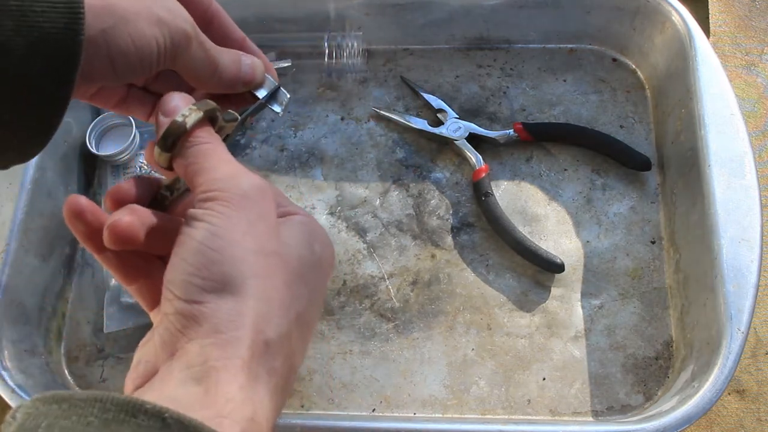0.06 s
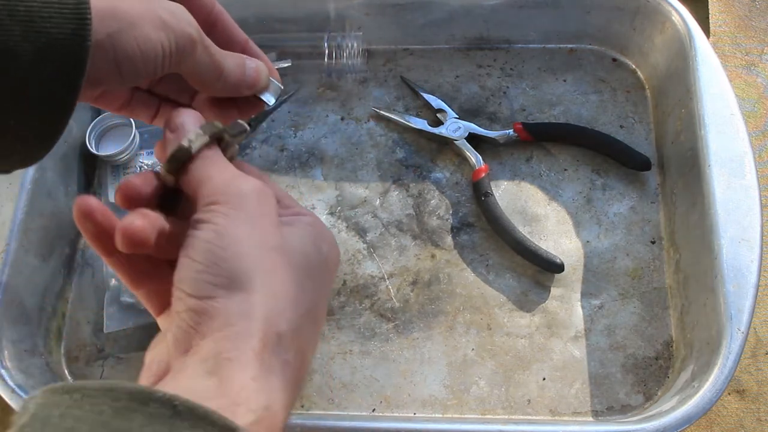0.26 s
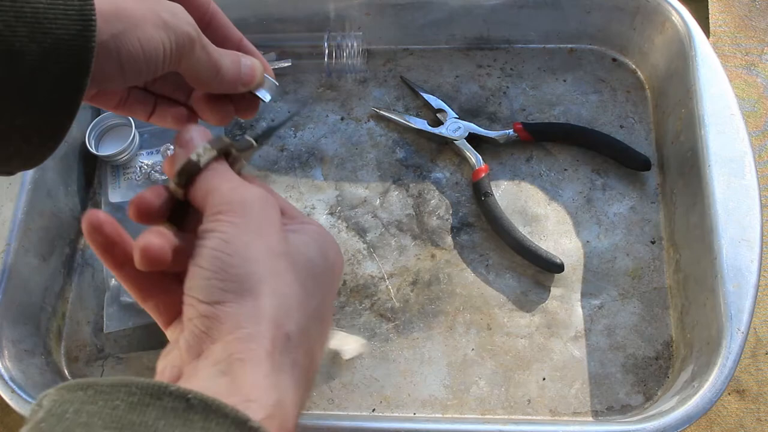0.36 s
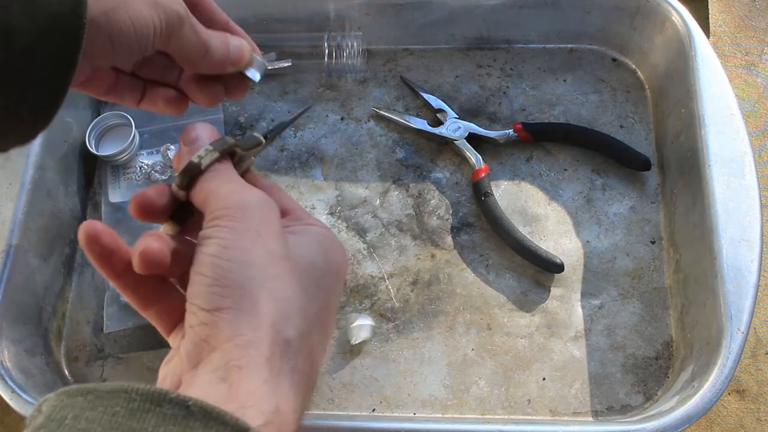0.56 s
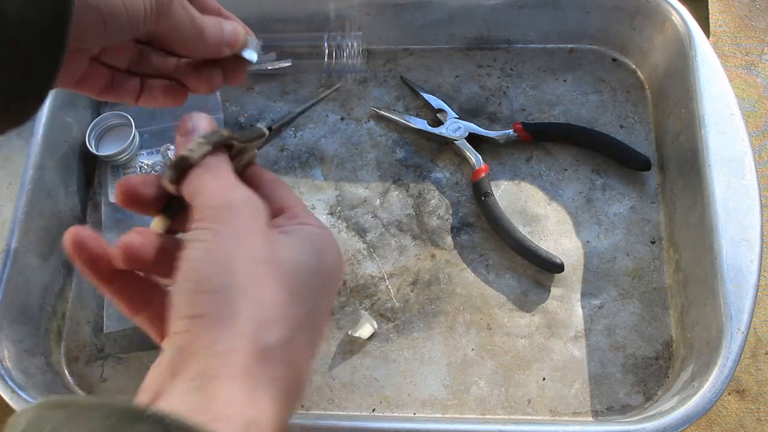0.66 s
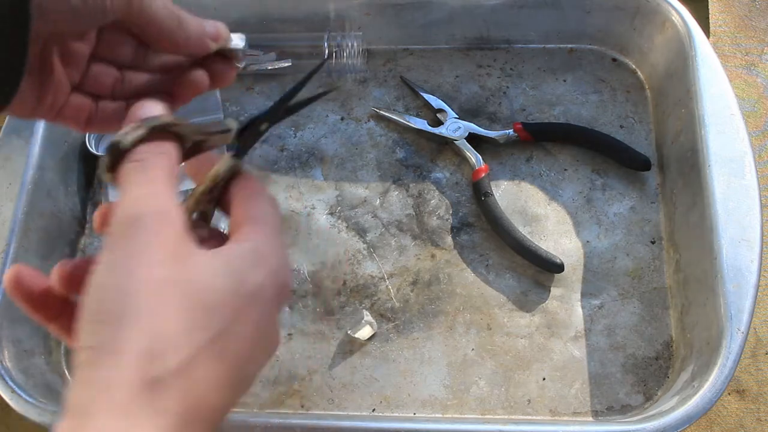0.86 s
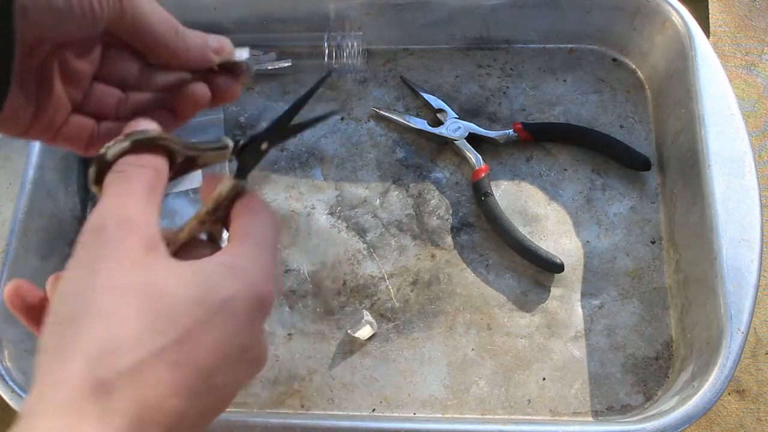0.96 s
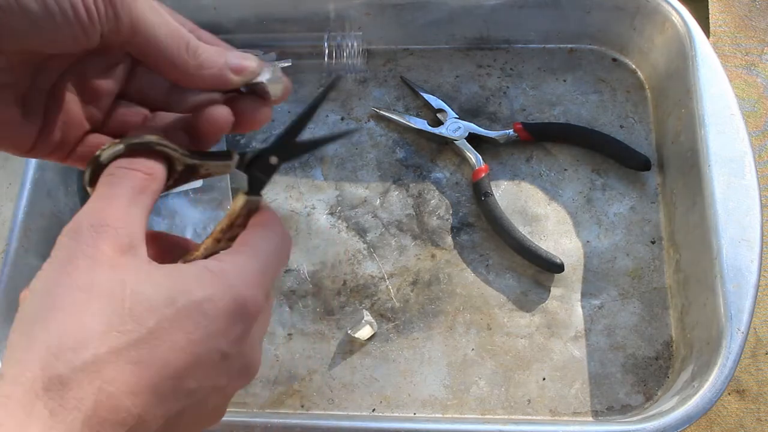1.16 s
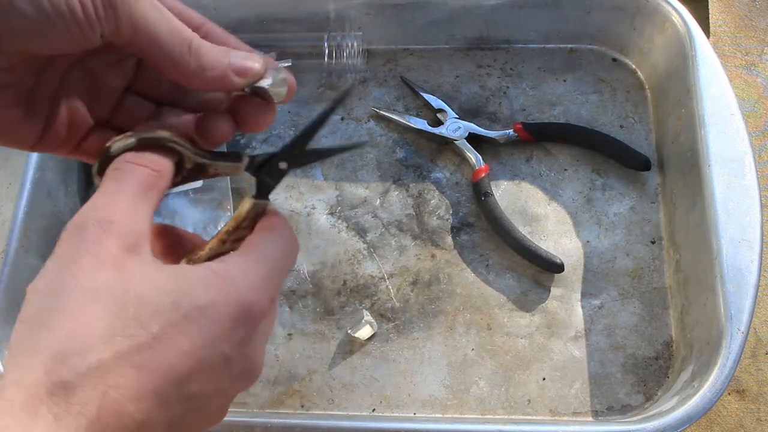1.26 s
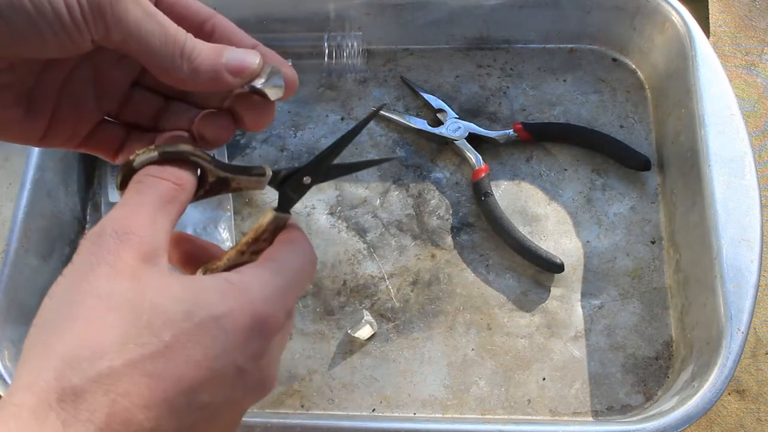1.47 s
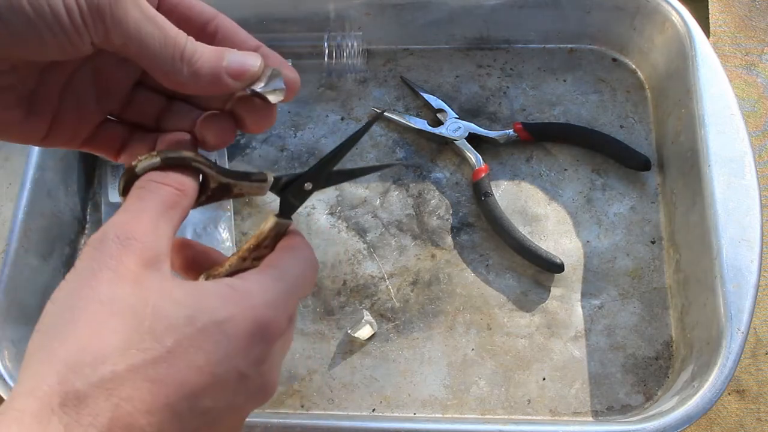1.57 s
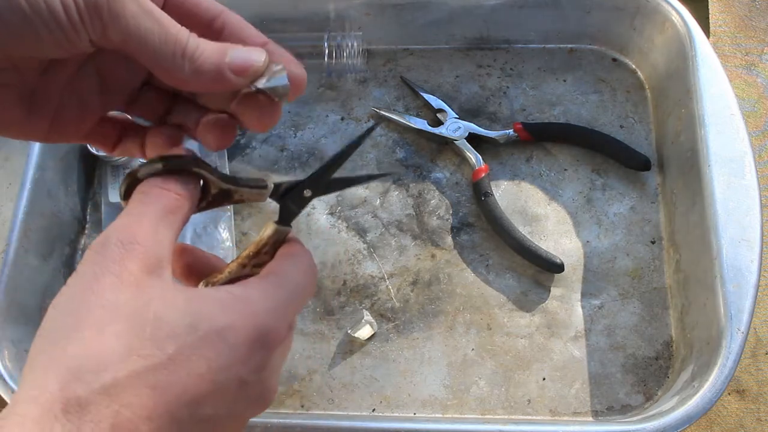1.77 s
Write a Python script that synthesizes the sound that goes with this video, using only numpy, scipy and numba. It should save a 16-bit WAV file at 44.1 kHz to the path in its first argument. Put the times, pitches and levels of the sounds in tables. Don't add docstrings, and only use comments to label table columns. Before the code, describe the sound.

A small piece of cut metal clangs into a sheet-metal baking pan just after a bright scissor snip, bounces in quick weakening ticks and settles; close microphone outdoors, soft air hiss and low rumble behind.

```python
import sys
import numpy as np
from scipy import signal
from scipy.fft import rfft, irfft
from scipy.io import wavfile
from scipy.ndimage import uniform_filter1d
from numba import njit

SR = 44100
rng = np.random.default_rng(int(sys.argv[2]) if len(sys.argv) > 2 else 0)


def ratio(d):
    e = np.asarray(d, float) / 20
    return 10 ** e


def waveform_to_disk(signal):
    frames = np.transpose(np.atleast_2d(signal))
    scaled = np.clip(frames, -1, 1) * 32767
    samples = np.round(scaled).astype(np.int16)
    wavfile.write(sys.argv[1], SR, samples)


N = 79380


def curve(table, hz):
    rows = np.array(table)
    return np.interp(np.log(hz), np.log(rows[:, 0]), rows[:, 1])


def unit(x):
    return x / np.sqrt(np.mean(x ** 2))


def fade(size, t60_s):
    return ratio(-60 * np.arange(size) / SR / t60_s)


def walk(rate_hz):
    hold = int(SR / rate_hz)
    steps = np.repeat(rng.standard_normal(N // hold + 1), hold)
    return 1.4 * uniform_filter1d(uniform_filter1d(steps, hold), hold)[:N]


def colour(x, db_of_hz):
    hz = np.maximum(np.fft.rfftfreq(len(x), 1 / SR), 1)
    return irfft(rfft(x) * ratio(db_of_hz(hz)), len(x))


def thin(x):
    return signal.sosfilt(signal.butter(3, 180, "high", fs=SR, output="sos"), x)


def dull(x, hz):
    return signal.sosfilt(signal.butter(2, hz, fs=SR, output="sos"), x)


@njit
def moving_band(x, hz, width_hz):
    y, band, low = np.empty(len(x)), 0., 0.
    for i in range(len(x)):
        g, damping = np.tan(np.pi * hz[i] / SR), width_hz / hz[i]
        v = (band + g * (x[i] - low)) / (1 + g * (g + damping))
        band = 2 * v - band
        low = low + 2 * g * v
        y[i] = damping * v
    return y


def noise_band(hz, width_hz):
    once = moving_band(rng.standard_normal(N), hz, width_hz)
    return unit(moving_band(once, hz, width_hz))


def poles(hz, t60_s):
    return np.exp(2j * np.pi * hz / SR - np.log(1000) / (t60_s * SR))


@njit
def ring(start, pole, gain, size):
    y = np.zeros(size)
    for k in range(len(pole)):
        z = gain[k] + 0j
        for i in range(start[k], size):
            z = z * pole[k]
            y[i] += z.imag
    return y


def add(out, x, start_s, peak_db):
    i = int(start_s * SR)
    out[i:i + len(x)] += x[:N - i] * ratio(peak_db) / np.abs(x).max()


TOP_HZ = 15830
# pitch_hz, level_db (per Hz)
AIR_SPECTRUM = [(18, -53.5), (30, -17.5), (54, -11), (86, -14), (235, -0.5), (323, -8.5), (1450, -13),
                (15200, -30), (16500, -42)]
# time_s, hiss_db, rumble_db, hum_db
BACKGROUND_LEVELS = [(0, -70, -72, -82), (.2, -69.5, -72.5, -80), (0.601, -64.5, -60, -81),
                     (0.848, -65.5, -62, -71.5), (1.0, -61.5, -58.5, -72), (1.2, -60.5, -58, -68.5),
                     (1.4, -61.5, -60, -69), (1.62, -62, -60.5, -66.5), (1.7, -62, -67.5, -69.5),
                     (1.8, -62.5, -72.5, -64)]


def outdoors():
    t = np.arange(N) / SR
    rows = np.array(BACKGROUND_LEVELS).T
    hiss_db, rumble_db, hum_db = (np.interp(t, rows[0], r) for r in rows[1:])
    hiss = unit(colour(rng.standard_normal(N), lambda hz: curve(AIR_SPECTRUM, hz) - 40 * (hz > TOP_HZ)))

    rumble_hz = 275 - 45 * t
    rumble = dull(dull(noise_band(rumble_hz, 125.), 315), 315)
    rumble = rumble * 1.465 * ratio(2.1 * walk(24))
    growl = noise_band(118 + 0 * t, 45.) * ratio(-6.5 + 2.3 * walk(4.5))

    hum_hz = 65 + .8 * walk(6)
    hum = np.sqrt(2) * np.sin(2 * np.pi * np.cumsum(hum_hz) / SR) * ratio(1.1 * walk(9))

    pulse = 1 + .7 * np.sin(2 * np.pi * 12.9 * t + 3.9)
    whine = np.sin(2 * np.pi * 15750 * t) * pulse * ratio(-89)

    hiss = hiss * ratio(hiss_db + 0.89 * walk(4.934))
    return hiss + (rumble + growl) * ratio(rumble_db) + hum * ratio(hum_db) + whine


# start_s, level_db, chatter_s
SNIP_EVENT = (.2213, -6.5, 0.001)
# pitch_hz, width_hz, level_db
BLADE_MODES = [(382, 140, 4), (1102, 500, -10.5), (1920, 140, 6.5), (3450, 680, -4.5), (4730, 590, -5.5),
               (5460, 360, -4), (5938, 280, 5.5), (8200, 670, -6), (10343, 780, -9), (12820, 500, -17.5),
               (15450, 440, -15)]


def snip(size=4000):
    out = np.zeros(N)
    start_s, level_db, chatter_s = SNIP_EVENT
    hz, width_hz, db = np.r_[BLADE_MODES, BLADE_MODES].T
    index = np.arange(len(hz))
    again = index >= len(BLADE_MODES)
    t60_s = np.log(1000) / np.pi / width_hz / 1.7
    sign = (-1.) ** (index % len(BLADE_MODES))
    heard = ~(again & (hz < 3000))
    gain = ratio(db - 3 * again) * width_hz / 200 * sign * heard
    start = (again * chatter_s * SR).astype(np.int64)
    blades = ring(start, poles(hz, t60_s), gain, size)

    noise = rng.standard_normal(size=(3, size + 1))
    hiss = np.diff(noise[0]) / 2 * ratio(-9.5) * fade(size, .012)
    tail, echo = np.diff(dull(noise[1:], 5000)) * fade(size, 0.1287)
    close = blades / np.abs(blades).max() + hiss + tail * ratio(-35.5)
    add(out, thin(close), start_s, level_db)
    add(out, echo, start_s + .0115, -43.5)
    return out


def contacts(chance, pick, length_s):
    k = np.arange(len(chance))
    at = (k + chance * (k > 0)) / len(k) * abs(length_s) * SR
    return at.astype(np.int64)[(pick * len(k)).astype(int)]


# start_s, peak_db, treble_db (per octave), chatter_s, ring_share (of full ring time)
BLOW_EVENTS = [(.2730, 2.5, -1, 0.0019, 0.73), (.2838, -9, -1.3, .004, 0.58), (0.2938, -17.5, 0, 0.0081, 1),
               (0.3594, -12, 0.75, .005, 0.68), (.379, -25, -1, .006, 0.77),
               (0.4057, -24.5, -7, 0.0091, 0.52), (0.441, -32.5, -7, .006, .6),
               (.4565, -27.5, -1, .004, 0.96), (0.468, -31, -8.3, 0.01, 0.67),
               (0.4892, -23.5, -2.2, .005, 0.78), (0.553, -30, -3.9, .015, 0.47),
               (0.6622, -28, 0.5, .006, 0.83), (0.696, -40.5, -4.5, .005, 1),
               (.701, -29.5, -1, 0.0068, 0.53), (0.7245, -71, -1, 0.0044, 0.86),
               (0.7408, -37.5, -3.3, .014, 0.55), (.762, -38, -7, 0.014, 0.83),
               (.780, -44, 0.5, .004, 0.96), (.792, -47, -1.3, 0.0081, 0.54), (0.804, -47, -1, .008, 0.75)]
# pitch_hz, level_db, t60_s
PAN_MODES = [(293.5, -18.5, 0.63), (617, -14, 0.061), (716, -11, .06), (790.6, -3.5, .085), (859, -2, .07),
             (940.6, -2.5, 0.054), (1001.5, -6.5, .06), (1144, -6.5, .07), (1212, -8.5, 0.15),
             (1255, -7.5, .07), (1415, -12.5, .07), (1762, -7.5, .07), (2080, -12.5, .065),
             (4347, -18.5, 0.1)]
# pitch_hz, level_db
SHEET_LEVEL = [(120, -31), (300, -13.5), (600, -21.5), (720, -7), (1250, -6.5), (2500, -15.5),
               (5200, -22.5), (16000, -64)]
# pitch_hz, t60_s
SHEET_RING = [(150, 0.22), (700, 0.072), (1800, 0.083), (5000, 0.063), (13000, .04)]


def pan(count=520, size=8000):
    out, clear = np.zeros(N), np.array(PAN_MODES).T
    dense_hz = 110 + 15500 * ((np.arange(count) + rng.random(count)) / count) ** 1.8
    dense_t60_s = curve(SHEET_RING, dense_hz) * ratio(.8 * rng.standard_normal(count))
    spacing_hz = np.gradient(dense_hz)
    dense_db = curve(SHEET_LEVEL, dense_hz) + 10 * np.log10(spacing_hz / 30 / dense_t60_s * .1)
    hz = np.r_[clear[0], dense_hz]
    db = np.r_[clear[1] + 2.5, dense_db]
    t60_s = np.r_[clear[2], dense_t60_s]

    free = (rng.random(len(hz)) < .5) & (np.arange(len(hz)) >= len(PAN_MODES))
    db = db - 9 * free
    light = (hz < 560) | (abs(hz - 1000) < 100)
    octaves = np.log2(np.maximum(hz / 1000, 1))
    end_fade = np.minimum(np.arange(size, 0, -1) / 2000, 1)

    for start_s, peak_db, treble_db, chatter_s, ring_share in BLOW_EVENTS:
        spot, pick = rng.standard_normal((2, len(hz))), rng.random(len(hz))
        light_db = 4 * light * (start_s > .3)
        gain = np.sign(spot[0]) * ratio(db + 3 * spot[1] + treble_db * octaves - light_db)
        start = contacts(rng.random(size=5), pick, chatter_s)
        blow_t60_s = np.clip(t60_s * np.where(free, 1.5, ring_share), .005, .6)
        clang = ring(start, poles(hz, blow_t60_s), gain, size)
        crack = dull(rng.standard_normal(size), 4000) * fade(size, 0.0068)
        crack = crack * ratio(-26.5 + 1.5 * treble_db)
        add(out, thin(clang / np.abs(clang).max() + crack) * end_fade, start_s, peak_db)

    thump = np.sin(2 * np.pi * 74.6 * np.arange(size) / SR) * fade(size, 0.045)
    add(out, thump, BLOW_EVENTS[0][0], -33.5)
    return signal.sosfilt(signal.butter(8, TOP_HZ, fs=SR, output="sos"), out)


def scene():
    return (snip() + pan() + outdoors())[None]


def low_pass(x):
    return signal.sosfilt(signal.butter(12, 17060, fs=SR, output="sos"), x)


def record(dry):
    limit = 0.46
    mix = np.clip(dry, -limit, limit)
    return low_pass(mix)


dry = scene()
out = record(dry)
waveform_to_disk(out)
```